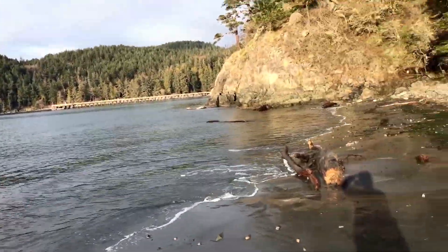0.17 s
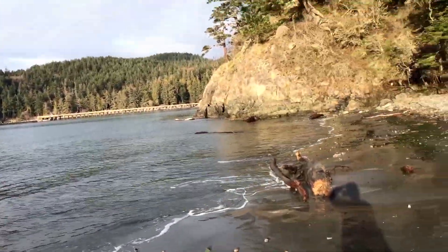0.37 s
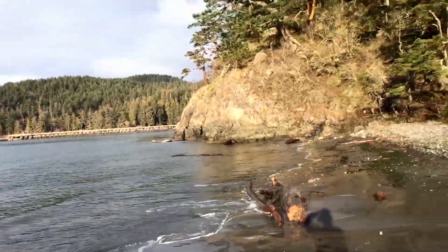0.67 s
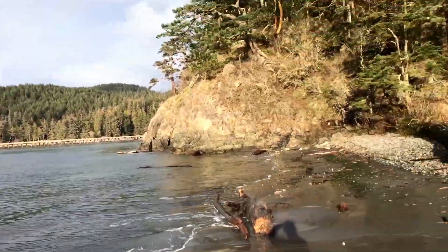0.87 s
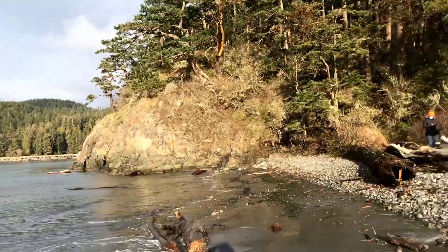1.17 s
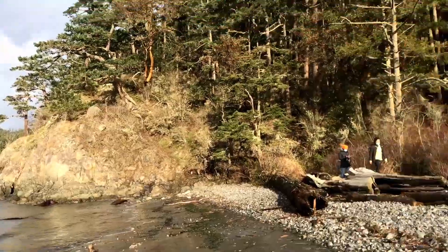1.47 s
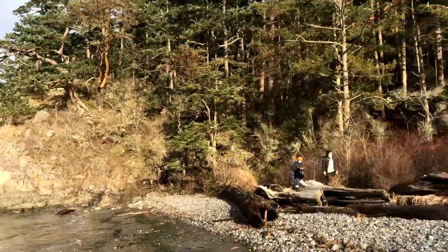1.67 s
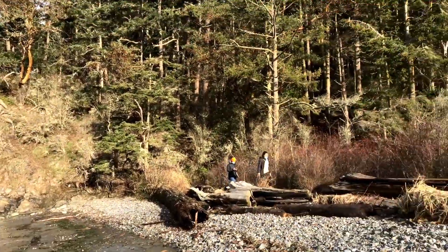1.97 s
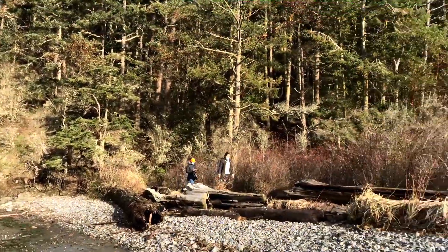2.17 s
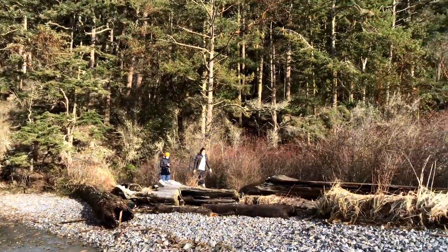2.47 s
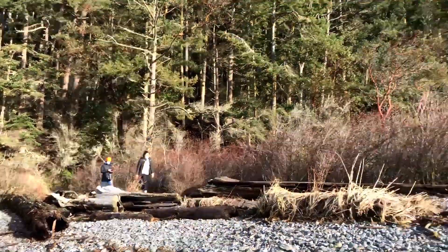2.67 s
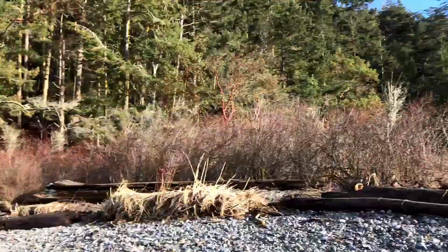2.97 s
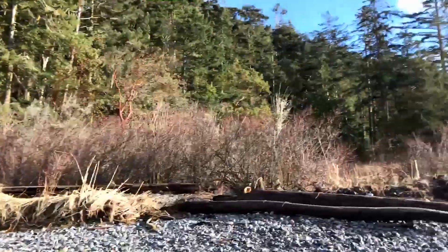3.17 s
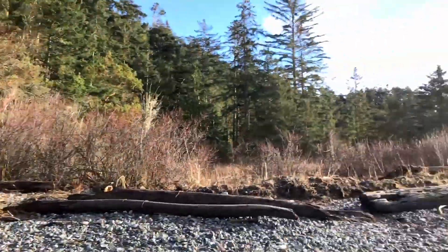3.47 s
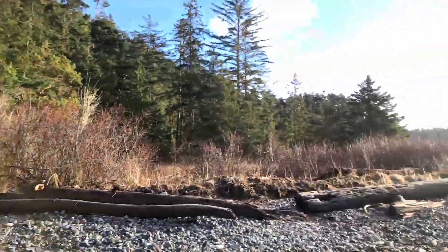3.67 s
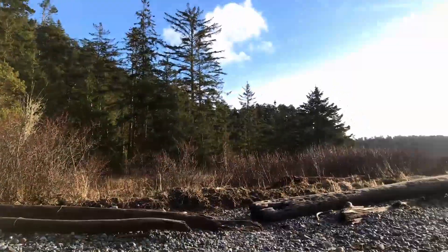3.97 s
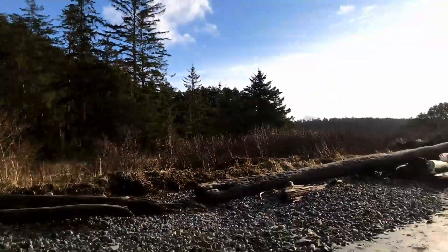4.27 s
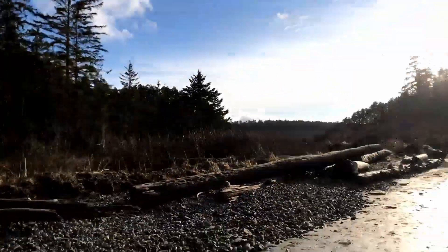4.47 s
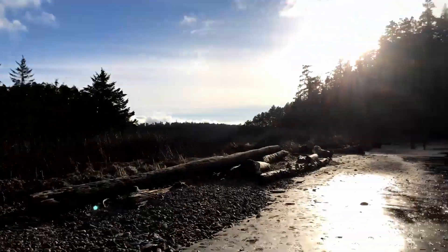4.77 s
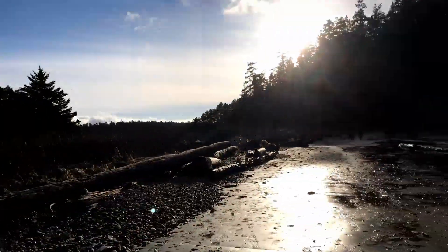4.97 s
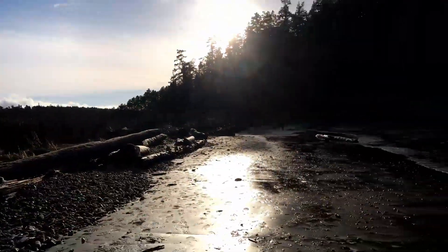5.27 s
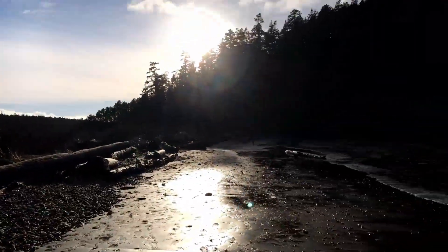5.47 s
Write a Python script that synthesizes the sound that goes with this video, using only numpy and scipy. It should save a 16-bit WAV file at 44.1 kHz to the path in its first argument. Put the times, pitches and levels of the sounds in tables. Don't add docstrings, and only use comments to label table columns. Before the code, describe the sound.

Small waves wash over a pebble shore while wind rumbles on a hand-held microphone, pebbles click and a hand knocks the casing.

```python
import sys
import numpy as np
from scipy import signal
from scipy.io import wavfile
from scipy.ndimage import uniform_filter1d

SR = 44100
rng = np.random.default_rng(int(sys.argv[2]) if len(sys.argv) > 2 else 0)


def to_wav(s):
    ch = np.atleast_2d(s).T
    pcm = np.round(np.clip(ch, -1, 1) * 32767)
    wavfile.write(sys.argv[1], SR, pcm.astype(np.int16))


def makeup_ratio(level_db):
    decades = np.asarray(level_db, float) / 20
    return 10 ** decades


N = 247842

# (time [s], fizz level [dB], presence of the nearest foam [dB])
WASH = [(0, -52, -13.5), (.36, -50, -14.5), (.85, -49.5, -13.5), (1.1, -53.5, -6), (1.33, -51.5, -13.5),
        (1.5, -48, -9), (1.8, -50.5, -8.5), (1.92, -54.5, -1), (2.03, -48, 7.5), (2.28, -34, -2.5),
        (2.95, -35, -3), (3.45, -37, -1), (3.9, -45, -5.5), (4.15, -44, -17.5), (4.4, -35.5, -16),
        (4.8, -33.5, -14), (5.25, -40.5, -6), (5.62, -40, -13)]
# (time [s], treble reaching the port [dB])
TURN = [
    (0, -4),
    (1.3, -5.5),
    (1.9, -5.5),
    (2.3, -13.5),
    (3.1, -15.5),
    (3.75, -28.5),
    (4.2, -23),
    (4.5, -29.5),
    (5.62, -29.5),
]
QUIET_FIZZ_DB = -51


def waves():
    # (frequency [Hz], density [dB per Hz])
    fizz_spectrum = [(410, -40), (700, -33), (747, -21), (808, -10.5), (1420, -4), (2090, -1.5),
                     (2830, 1.5), (4580, -3), (4890, -1.5), (5940, -3), (7710, -13), (9260, -15),
                     (10700, -27), (15800, -38.5)]
    # (frequency [Hz], density [dB per Hz])
    hollow_spectrum = [(82, -32), (140, 2), (322, 6.5), (468, 3.5), (522, 6), (747, -3), (900, -10),
                       (1170, -39), (1980, -120)]
    # (time [s], hollow plunge level [dB])
    breakers = [
        (0, -56),
        (2.43, -41.5),
        (3.05, -48),
        (3.4, -50),
        (4.36, -48.5),
        (4.55, -44),
        (4.87, -47),
    ]
    usual_presence_db, usual_treble_db = -4.5, -20
    bubbles_per_s = 330
    (fizz_db, presence_db), (treble_db,) = in_time(WASH), in_time(TURN)

    share = 0.41 - 0.02 * (fizz_db - QUIET_FIZZ_DB) + 0.36 * draining()
    shade_db = presence_db - usual_presence_db, treble_db - usual_treble_db
    fizz = water(fizz_spectrum, (700, 16000), 27, np.full(N, bubbles_per_s / 3), share, shade_db,
                 cycles=34.0, spread_db=3.4, patchy_db=1.15)
    plunge = water(hollow_spectrum, (130, 900), 11, np.full(N, 90.0), 0.11, (0, 0),
                   cycles=5.8, spread_db=8.0, patchy_db=1.64)
    plunge_db = swells(breakers, rise_db_s=55.5, fall_db_s=16.5, rest_db=-63)
    return makeup_ratio(fizz_db + 2.0) * fizz + makeup_ratio(plunge_db + 3.0) * plunge


def water(spectrum, edges_hz, count, per_s, share, shade_db, cycles, spread_db, patchy_db):
    # (frequency [Hz], share of the presence change [ratio], share of the treble change [ratio])
    casing_shadow = [(1000, -.1, 0.051), (2250, 0.17, 0), (4760, 0.44, 0), (5830, 0.43, 0.27),
                     (6800, 0.43, 0.54), (8300, 0.24, 0.49), (10800, 0, 0.69), (15500, 0, 1.16)]
    presence_db, treble_db = shade_db
    out, power = 0, 0
    together = drift(7.8)
    share = np.clip(share, 0, 1)
    clumped = per_s * makeup_ratio(3 * drift(14))
    for hz, width, sos, hiss in bands(*edges_hz, count):
        pops = rms_one(signal.sosfilt(sos, ring(bursts(clumped, spread_db), hz, cycles / hz)))
        pops = pops * np.sqrt(np.mean(per_s) / per_s)
        weight = makeup_ratio(at_hz(spectrum, hz)) * np.sqrt(width)
        shaded_db = at_hz(casing_shadow, hz, column=1) * presence_db
        shaded_db = shaded_db + at_hz(casing_shadow, hz, column=2) * treble_db
        gain = weight * makeup_ratio(shaded_db + patchy_db * (0.44 * together + drift(9.7)))
        near = share / (1 + (hz / 10000) ** 4)
        out = out + gain * (np.sqrt(1 - near) * hiss + np.sqrt(near) * pops)
        power += weight ** 2
    return out / np.sqrt(power)


def draining():
    start_s, end_s, edge_s = 1.286, 1.73, 0.1
    t = np.arange(N) / SR
    return np.clip(np.minimum(t - start_s, end_s - t) / edge_s + 0.5, 0, 1)


def crackle():
    stir_db = in_time(WASH)[0] - QUIET_FIZZ_DB
    facing_db = 0.56 * (in_time(TURN)[0] + 6)
    drain = draining()
    pops_per_s = 60 + 400 * drain
    level_db = -49.5 + 0.9 * (stir_db + facing_db) + 9 * drain
    out = 0
    for hz in np.geomspace(2600, 10000, 9):
        sos = signal.butter(2, [hz / 2.0, hz * 1.8], "band", fs=SR, output="sos")
        out = out + signal.sosfilt(sos, ring(bursts(pops_per_s / 9, 2.5), hz, 9.0 / hz))
    return makeup_ratio(level_db) * out


def pebbles():
    # (time [s], peak level [dB], pitch [Hz])
    pebble_clicks = [(.264, -40, 3470), (.364, -38, 5850), (.3804, -40, 5220), (.6594, -38.5, 3590),
                     (.7292, -36.5, 7000), (1.166, -36, 2800), (1.27, -40, 2550), (1.3506, -37, 3230),
                     (1.3724, -35, 6740), (1.381, -32, 5370), (1.4246, -35, 5760), (1.529, -31, 5200),
                     (1.557, -28.5, 3530), (1.6315, -30, 6080), (1.723, -29, 2600), (1.9103, -33, 3700),
                     (1.9423, -41, 1940), (2.023, -30.5, 3150), (2.075, -33, 7000), (2.1935, -25, 3650),
                     (2.2397, -25, 2960), (2.271, -27, 2370), (2.2827, -22, 2180), (2.418, -20, 5550),
                     (3.02, -28, 6040), (4.2253, -30.5, 2040), (4.4994, -27, 2470), (4.584, -28, 2200),
                     (4.7994, -28, 2300), (5.107, -24, 2400)]
    # (time [s], peak level [dB], pitch [Hz])
    clacks = [
        (1.381, -31, 6800),
        (1.53, -37, 6200),
        (1.5559, -28, 4590),
        (1.8577, -41, 4230),
        (1.9106, -30, 6150),
        (1.9405, -36, 6400),
        (2.9953, -23, 6700),
    ]
    # (time [s], peak level [dB])
    spray = [(1.2875, -46), (1.308, -40), (1.3982, -36), (1.4324, -40), (1.486, -41), (1.5154, -38),
             (1.6684, -42), (1.8876, -43), (3.1188, -32), (3.1507, -36), (4.2024, -42), (4.227, -37.5),
             (4.3076, -45), (4.5012, -38), (4.583, -38), (5.1144, -42)]
    # (time [s], peak level [dB], pitch [Hz], 60 dB decay [s])
    drips = [
        (1.101, -42.5, 564, 0.12),
    ]

    ticks = [(*row, 0.01, -7) for row in pebble_clicks]
    ticks += [(*row, 0.0025, 8) for row in clacks]
    ticks += [(*row, 8400 * rng.uniform(0.95, 1.1), 0.0038, -7) for row in spray]
    out, t = np.zeros(N), np.arange(SR // 8) / SR
    grit = rng.standard_normal((len(ticks), SR // 8)) * makeup_ratio(-60 * t / 0.0083)
    for (s, level_db, hz, t60, grit_db), noise in zip(ticks, grit):
        mode = ring(noise, hz, t60)
        tick = mode / np.abs(mode).max() + makeup_ratio(grit_db - 9) * noise
        sos = signal.butter(2, [hz / 3.3, min(8.2 * hz, 11000)], "band", fs=SR, output="sos")
        tick = signal.sosfilt(sos, tick)
        out = place(out, s + 0.00085, makeup_ratio(level_db + 0.5) * tick / np.abs(tick).max())
    for s, level_db, hz, t60 in drips:
        envelope = makeup_ratio(level_db - 60 * t / t60) * np.minimum(t / 0.0063, 1)
        out = place(out, s, envelope * np.sin(2 * np.pi * hz * t))
    return out


def sheets():
    # (start [s], end [s], level [dB], lowest frequency [Hz])
    puffs = [
        (0.114, 0.132, -44, 1500),
        (4.15, 4.28, -68, 7000),
        (4.623, 4.71, -56, 11500),
        (5.07, 5.13, -63, 10400),
        (5.22, 5.28, -67, 6500),
    ]
    out, t = np.zeros(N), np.arange(N) / SR
    for (start, end, level_db, low_hz), noise in zip(puffs, rng.standard_normal((len(puffs), N))):
        soft = signal.lfilter([1], [1, -0.85], noise)
        hiss = signal.sosfilt(signal.butter(4, low_hz, "high", fs=SR, output="sos"), soft)
        out += makeup_ratio(level_db) * hiss * np.sin(np.pi * np.clip((t - start) / (end - start), 0, 1))
    return out


def knocks():
    # (time [s], peak level [dB], casing pitch [Hz], hard edge level [dB])
    casing_hits = [
        (.2108, -22, 563, -32),
        (1.751, -30, 436, -50),
        (1.753, -24, 408, -45),
        (1.826, -16.5, 390, -39),
        (1.8461, -13.5, 438, -22),
        (1.8682, -25, 370, -49),
        (4.543, -16.5, 470, -32),
        (4.545, -13.5, 440, -25),
        (5.09, -14, 400, -18),
    ]
    # (time [s], level [dB], pitch [Hz])
    thumps = [
        (.1235, -14, 43),
        (.1435, -18, 41),
        (.2125, -23, 50),
        (1.8258, -21, 48),
        (1.845, -18, 42.7),
        (1.8677, -29, 43.3),
        (4.544, -22.5, 53.3),
        (5.091, -25, 58),
    ]
    # (time [s], taps [count], first gap [s], first tap level [dB], loss per tap [dB])
    chatters = [
        (0.1161, 4, .0025, -13, 0.6),
        (0.1273, 3, 0.00191, -17, 2),
    ]
    snap_s, snap_db = 1.8262, -13
    peak_s = 0.0015

    click, t = signal.unit_impulse(SR // 4), np.arange(SR // 4) / SR
    snap = ring(click, 2100, 0.0006) + 1.5 * ring(click, 6400, 0.00049)
    snap = signal.lfilter([0.6], [1, -0.4], snap)
    out = place(np.zeros(N), snap_s, -makeup_ratio(snap_db) * snap)

    swell = t / peak_s * np.exp((1 - (t / peak_s) ** 3) / 3)
    linger = makeup_ratio(-9.5) * np.minimum(t / peak_s, 1) * np.exp(-t / 0.0036)
    swell = np.maximum(swell, linger)
    edge = t / 0.00075 * np.exp(1 - t / 0.00043) * np.sin(2 * np.pi * 1250 * t)

    taps = []
    for s, count, gap, db, loss_db in chatters:
        for k in range(int(count)):
            hz = 470 * rng.uniform(0.86, 1.11)
            taps.append((s + gap * k ** 0.808, db - loss_db * k, hz, db - 1.5 * loss_db * k - 10))
    for s, level_db, hz, edge_db in [*casing_hits, *taps]:
        modes = np.sin(2 * np.pi * hz * t)
        modes = modes + makeup_ratio(-8.0) * np.sin(2 * np.pi * 1.66 * hz * t)
        modes = modes - makeup_ratio(-9.5) * np.sin(2 * np.pi * 0.33 * hz * t)
        out = place(out, s, makeup_ratio(edge_db) * edge - makeup_ratio(level_db) * swell * modes)

    for s, thump_db, thump_hz in thumps:
        turns = thump_hz * (t + 0.009 * (1 - np.exp(-t / 0.008))) - 0.26
        thump = -np.sin(2 * np.pi * turns) * np.minimum(t / 0.0087, 1) * makeup_ratio(-60 * t / 0.14)
        out = place(out, s, makeup_ratio(thump_db + 9.5) * thump)
    return out


def wind():
    # (frequency [Hz], density [dB per Hz])
    rumble = [(7.1, -33), (12, -10), (27, 5.5), (43, 2), (79, -14), (145, -55), (173, -37), (259, -59),
              (300, -44), (390, -74), (660, -120)]
    # (time [s], deep bass level [dB])
    gusts = [(.06, -25), (.4, -27.5), (.57, -28.5), (.7, -28), (.93, -28.5), (1.06, -30), (1.16, -30),
             (1.43, -31), (1.58, -29), (2.0, -31.5), (2.33, -32), (2.56, -25.5), (2.69, -37), (2.85, -30),
             (2.98, -28), (3.18, -28), (3.35, -33.5), (3.5, -28.5), (3.75, -34), (3.97, -27.5),
             (4.12, -29.5), (4.3, -31), (4.63, -33), (4.77, -33.5), (4.87, -33.5), (5.0, -31),
             (5.19, -26.5), (5.4, -33), (5.56, -32.5)]
    # (time [s], level [dB])
    eddies = [(.06, -39), (.16, -28), (.25, -28), (.38, -31.5), (.8, -40), (.93, -38), (1.1, -40),
              (1.3, -32.5), (1.45, -34), (1.67, -37.5), (2.0, -40), (2.25, -39), (2.36, -37), (2.58, -42),
              (2.75, -44), (3.3, -35), (3.5, -44), (3.75, -30), (4.2, -41), (4.7, -38), (4.9, -32),
              (5.07, -33), (5.2, -39), (5.54, -36)]
    usual_flutter_db = -16.5
    gust_db = swells(gusts, rise_db_s=101, fall_db_s=90, rest_db=-37)
    flutter_db = swells(eddies, rise_db_s=200, fall_db_s=126, rest_db=-57) - gust_db
    out = 0
    for hz, width, sos, band in bands(11.78, 295, count=10):
        fluttering = np.clip(np.log2(hz / 45), 0, 1) * (flutter_db - usual_flutter_db)
        out = out + makeup_ratio(at_hz(rumble, hz) + fluttering + 0.4 * drift(7.5)) * np.sqrt(width) * band
    out = out / np.sqrt(uniform_filter1d(out ** 2, size=5000))
    return makeup_ratio(gust_db + 1.5) * out


def port(x):
    dip_hz, dip_width_hz, dip_share = 4930, 280, 0.35
    b, a = signal.iirpeak(dip_hz, dip_hz / dip_width_hz, SR)
    return x - dip_share * signal.lfilter(b, a, x)


def dull(x, cut_hz):
    return signal.sosfilt(signal.butter(6, cut_hz, fs=SR, output="sos"), x)


def bursts(per_s, spread_db):
    sizes = makeup_ratio(spread_db * np.minimum(rng.exponential(1, N), 4)) * rng.choice([-1, 1], N)
    return sizes * (rng.random(N) < per_s / SR) + 1e-18


def ring(clicks, hz, t60):
    r, w = makeup_ratio(-60 / (t60 * SR)), 2 * np.pi * hz / SR
    return signal.lfilter([0, np.sin(w)], [1, -2 * r * np.cos(w), r * r], clicks + 1e-18)


def bands(low_hz, high_hz, count):
    edges = np.geomspace(low_hz, high_hz, count + 1)
    white = rng.standard_normal((2, N + SR))
    for k, (low, high) in enumerate(zip(edges, edges[1:])):
        sos = signal.butter(2, [low, high], "band", fs=SR, output="sos")
        noise = rms_one(signal.sosfilt(sos, white[k % 2])[SR:])
        yield np.sqrt(low * high), high - low, sos, noise


def swells(rows, rise_db_s, fall_db_s, rest_db):
    s, peak_db = np.array(rows).T[:, :, None]
    late = np.arange(0, N + 40, 40) / SR - s
    slope = np.where(late < 0, rise_db_s, -fall_db_s)
    power = makeup_ratio(2 * (peak_db + slope * late)).sum(axis=0) + makeup_ratio(2 * rest_db)
    return np.repeat(10 * np.log10(power), 40)[:N]


def drift(rate):
    r = np.exp(-80 * np.pi * rate / SR)
    slow = signal.lfilter([1], [1, -2 * r, r * r], rng.standard_normal(N // 40 + 2002))[2000:]
    return np.interp(np.arange(N) / 40, np.arange(len(slow)), rms_one(slow))


def in_time(rows):
    s, *columns = np.vstack(rows).T
    return [np.interp(np.arange(N) / SR, s, c) for c in columns]


def at_hz(points, hz, column=1):
    points = np.array(points)
    return np.interp(np.log(hz), np.log(points[:, 0]), points[:, column])


def rms_one(x):
    return x / np.sqrt(np.mean(x ** 2) + 1e-20)


def place(out, s, sound):
    at = round(s * SR)
    return out + np.pad(sound, (at, N))[:N]


def scene():
    shore = waves() + dull(crackle(), 11000) + dull(pebbles(), 12700) + sheets()
    return (port(shore) + wind() + knocks())[None]


def roll_off(x):
    return signal.sosfilt(signal.butter(12, 16650, fs=SR, output="sos"), x)


def record(dry):
    cut = signal.sosfilt(signal.cheby2(12, 60, 16300, fs=SR, output="sos"), dry)
    return roll_off(cut)


dry = scene()
out = record(dry)
to_wav(out)
```